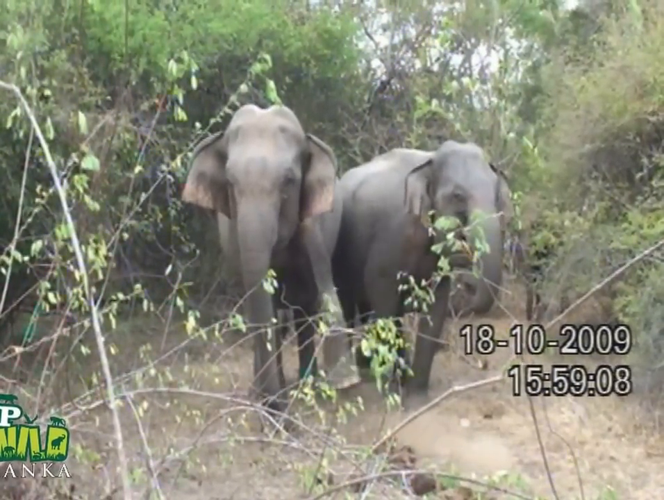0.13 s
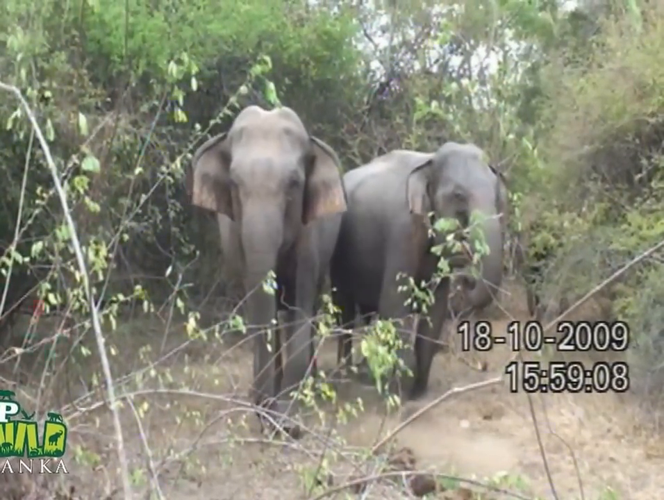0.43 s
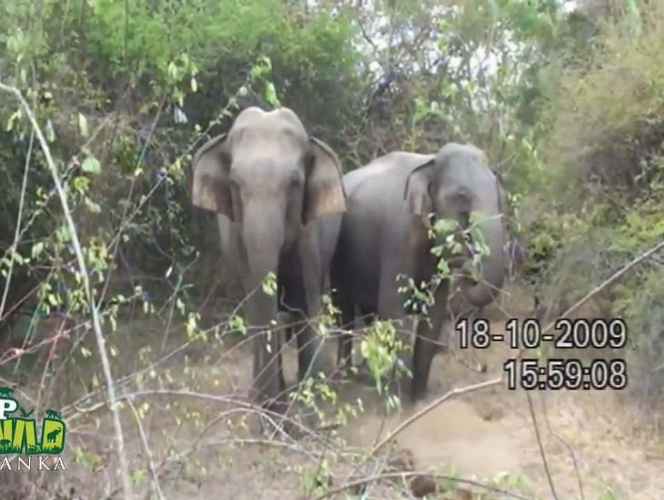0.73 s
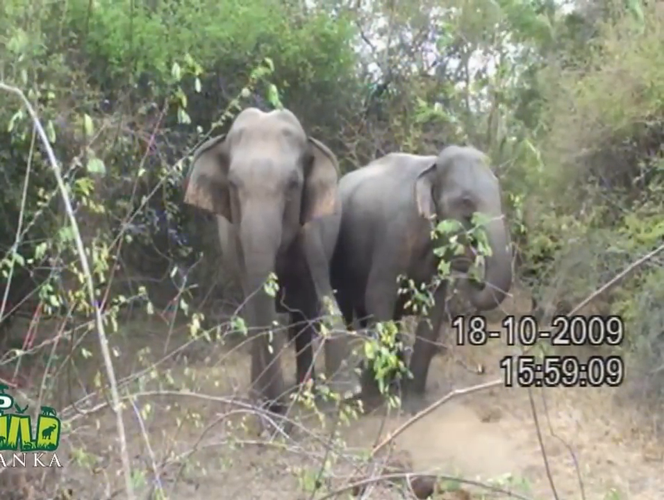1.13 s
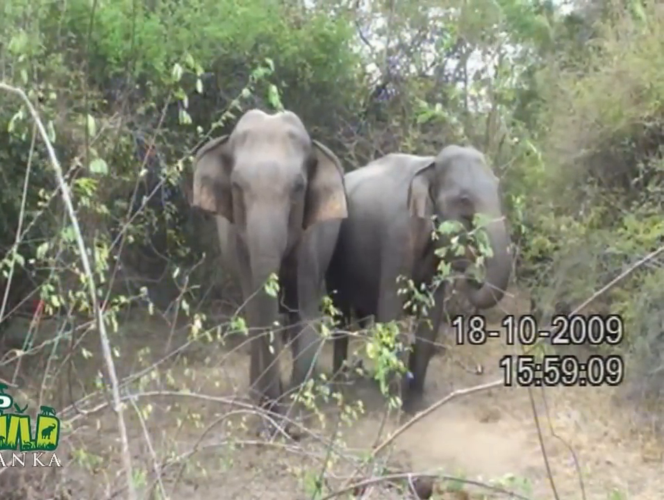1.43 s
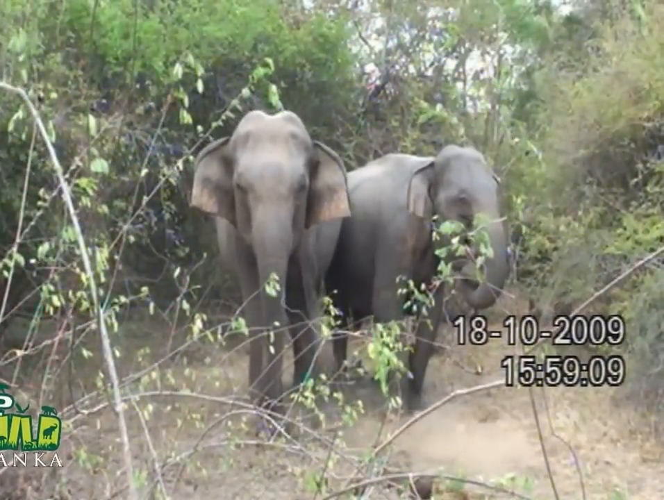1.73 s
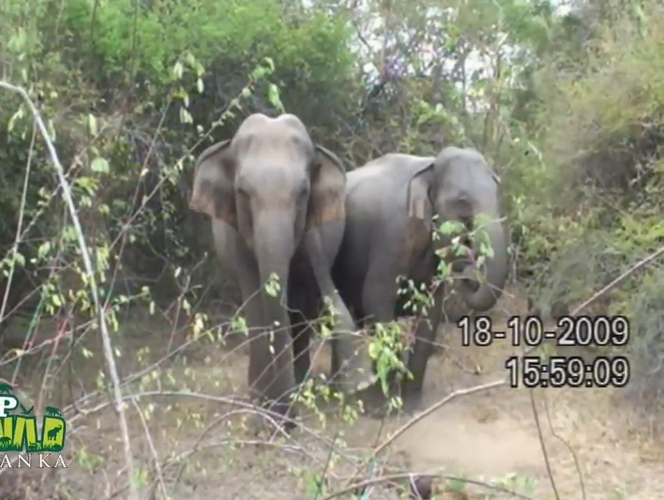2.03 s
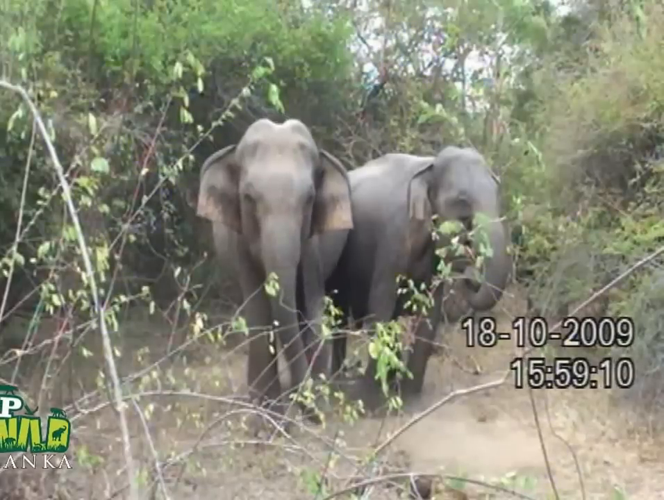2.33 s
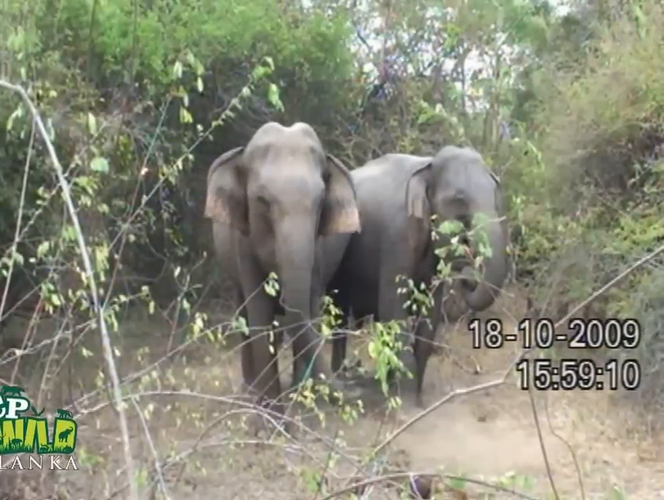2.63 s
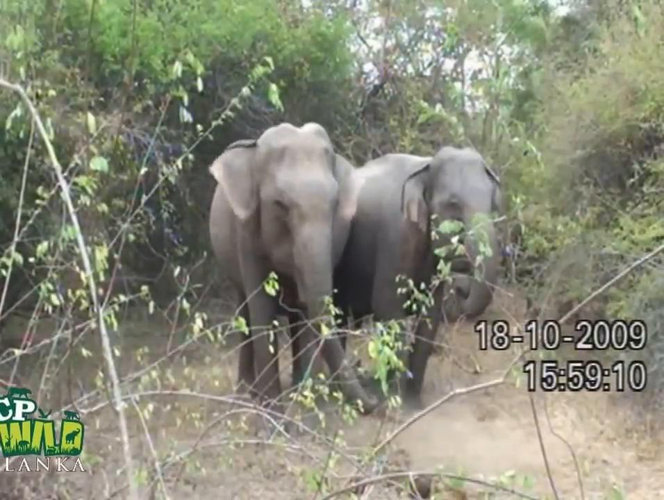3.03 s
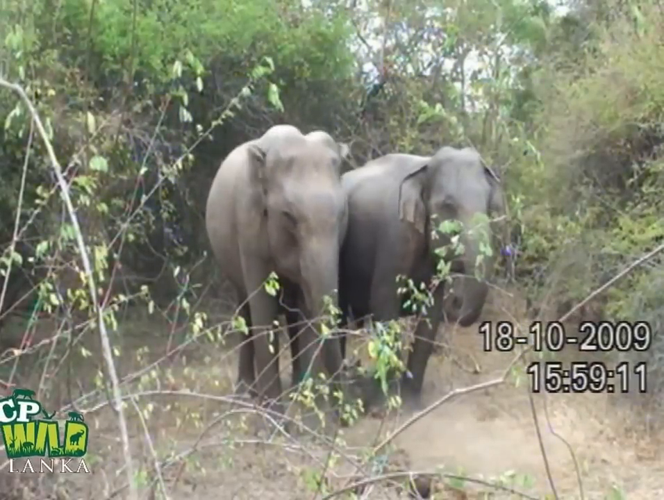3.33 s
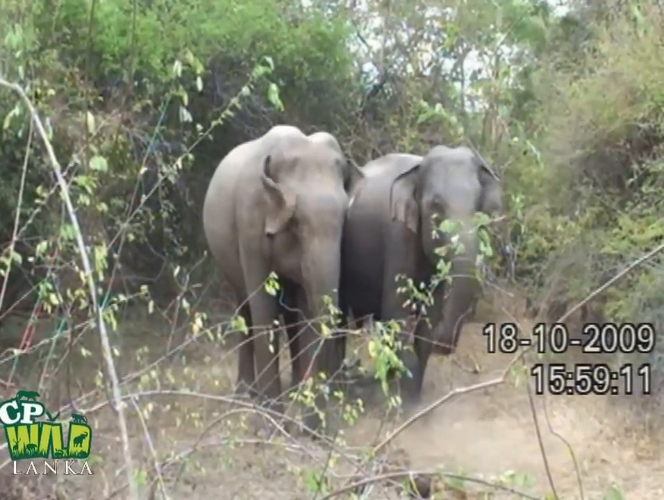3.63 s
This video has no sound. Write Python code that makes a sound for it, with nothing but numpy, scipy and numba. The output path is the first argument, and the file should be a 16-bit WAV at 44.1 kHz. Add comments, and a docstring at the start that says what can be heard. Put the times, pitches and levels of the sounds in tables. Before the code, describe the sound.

An elephant gives a long, rough, growling roar over a low engine rumble.

```python
"""Elephant roaring in dry scrub

An elephant a few metres off, a vehicle idling nearby. A clear high note over a low throat tone breaks up
into a chaotic growl: irregular puffs of air ring the throat, mouth and trunk, whose shape changes three
times. A thin squeal comes near the end. The camcorder's two close microphones pick up short echoes from
the scrub; it clips the loudest peaks and adds hiss and a faint line whine."""
import sys
import numpy as np
from scipy import signal
from scipy.fft import rfft, irfft
from scipy.io import wavfile
from scipy.ndimage import uniform_filter1d
from numba import njit

SR = 44100
rng = np.random.default_rng(int(sys.argv[2]) if len(sys.argv) > 2 else 0)


def transcribe(signal):
    """Save signal, clipped to [-1, 1], as a 16-bit WAV file at the path in sys.argv[1]."""
    frames = np.atleast_2d(signal).T
    limited = np.clip(frames, -1, 1)
    pcm = np.round(limited * 32767).astype(np.int16)
    wavfile.write(sys.argv[1], SR, pcm)


N = 166257
TIME = np.arange(N) / SR


def undb(db):
    """Turn dB into gain."""
    return 10 ** (np.asarray(db) / 20)


def unit(x):
    """Scale to rms 1."""
    return x / np.sqrt(np.mean(x ** 2))


def curve(table, col):
    """One column of a table, interpolated along time."""
    table = np.array(table, float)
    return np.interp(TIME, table[:, 0], table[:, col])


def walk(rate_hz):
    """Random levels held 1 / rate_hz seconds and smoothed twice; rms 1."""
    hold = int(SR / rate_hz)
    steps = np.repeat(rng.standard_normal(N // 40)[:N // hold + 1], hold)
    return unit(uniform_filter1d(uniform_filter1d(steps, hold), hold)[:N])


def phase_of(hz):
    """Phase of a tone that follows hz."""
    return 2 * np.pi * np.cumsum(hz) / SR


def decay(kicks, seconds):
    """Give each kick an exponential tail with this time constant."""
    return signal.lfilter([1], [1, -np.exp(-1 / (seconds * SR))], kicks)


@njit
def bandpass(x, hz, width):
    """State-variable band-pass with a moving centre, gain 1 there."""
    y, band, low = np.empty(len(x)), 0., 0.
    for i in range(len(x)):
        g, damping = np.pi * hz[i] / SR, width / hz[i]
        g = g + g ** 3 / 3
        v = (band + g * (x[i] - low)) / (1 + g * (g + damping))
        band, low = 2 * v - band, low + 2 * g * v
        y[i] = damping * v
    return y


def ring(x, hz, width_hz):
    """A steep resonance: two wider band-passes in series."""
    hz = hz + np.zeros(N)
    return bandpass(bandpass(x, hz, 1.4 * width_hz), hz, 1.4 * width_hz)


def coloured(x, spectrum):
    """Shape x by a spectrum of (Hz, dB) points; rms 1."""
    hz = np.fft.rfftfreq(N, 1 / SR) + 1
    points_hz, points_db = np.array(spectrum).T
    gain = undb(np.interp(np.log(hz), np.log(points_hz), points_db))
    return unit(irfft(rfft(x) * gain, N))


# The nearby vehicle at the microphones. Each row: time in seconds, level in dB.
ENGINE_LEVEL = [(0.05, -47), (0.23, -44.5), (0.25, -49), (1.99, -44), (2.06, -54), (2.31, -40.5),
                (3.77, -38.5)]
# Its hum. Each row: multiple of the firing rate, relative level in dB.
ENGINE_ORDERS = [(1, -22.5), (2, -10), (3, -2.5), (4, -18.5), (5, -17)]


def engine(firing_hz=26):
    """A vehicle idling nearby: low multiples of the firing rate over a dull rumble."""
    phase = phase_of(firing_hz * (1 + .013 * walk(3)))
    beat = sum(undb(db + .55 * walk(11)) * np.sin(k * phase) for k, db in ENGINE_ORDERS)
    rumble = ring(rng.standard_normal(N), hz=110, width_hz=80)
    return unit(unit(beat) + undb(-11) * unit(rumble)) * undb(curve(ENGINE_LEVEL, 1))


def scrub_echoes(x, t60_s=.29, level_db=-8):
    """Two short, unlike tails of echoes scattered by the scrub around the animal."""
    t = np.arange(SR // 2) / SR
    tails = rng.standard_normal((2, len(t))) * undb(-60 * t / t60_s)
    tails /= np.sqrt(np.sum(tails ** 2, axis=1, keepdims=True))
    return undb(level_db) * signal.fftconvolve(x[None], tails, axes=1)[:, :N]


# The closing squeal. Each row: time in seconds, lower and upper pitch in Hz, level of each in dB.
WHISTLES = [(3.38, 2360, 2590, -60), (3.43, 2415, 2625, -32), (3.49, 2425, 2650, -41),
            (3.53, 2400, 2685, -34), (3.6, 2420, 2690, -38)]


def squeal():
    """Two thin, fluttering whistles near the end of the roar."""
    pair = np.zeros(N)
    for col in (1, 2):
        hz = curve(WHISTLES, col) * (1 + .006 * walk(60))
        pair += np.sin(phase_of(hz)) * undb(3 * walk(40))
    sounding = (TIME > WHISTLES[0][0]) & (TIME < WHISTLES[-1][0])
    return np.sqrt(2) * pair * undb(curve(WHISTLES, 3)) * sounding


# When throat, mouth and trunk take their next shape. Each entry: time in seconds.
SHAPE_CHANGES_S = [1.75, 3.33, 3.62]
# The grain of the low tone. Each entry: roughness from 0 to 1 in one of the four shapes.
THROAT_ROUGHNESS = [1, 1, .45, .8]
# The low tone under the roar. Each row: time in seconds, pitch in Hz, level in dB.
THROAT_TONE = [(0, 201.7, -22), (.2, 212, -20.5), (.32, 222.8, -28), (.37, 213.3, -15.5),
               (.46, 212.3, -24.5), (.7, 226.4, -20.5), (1.05, 232, -22), (1.1, 238.7, -18.5),
               (1.5, 236.6, -18.5), (1.89, 238.2, -15.5), (1.93, 239.5, -18.5), (2.08, 221, -15),
               (2.3, 230.2, -18), (2.42, 231.1, -13), (2.65, 230.2, -17.5), (2.75, 236.2, -11.5),
               (2.92, 214, -16), (3.29, 215, -14.5), (3.38, 206.3, -13.5), (3.6, 189.2, -12),
               (3.65, 148.4, -20.5), (3.7, 141.8, -21.5), (3.77, 172, -12.5)]


def throat(airflow):
    """A wavering hum and the airflow ringing the throat at the same pitch, over a faint lower ring."""
    hz = curve(THROAT_TONE, 1)
    roughness = np.array(THROAT_ROUGHNESS)[np.searchsorted(SHAPE_CHANGES_S, TIME)]
    hum = np.sin(phase_of(hz * (1 + roughness * .05 * walk(75))))
    hum *= undb(roughness * 3 * walk(22.01))
    breath = roughness * undb(-4) * unit(ring(airflow, hz, width_hz=60))
    body = unit(ring(unit(hum) + breath, hz, width_hz=140))
    chest = undb(-39.5) * unit(ring(airflow, hz=154.2, width_hz=24))
    return body * undb(curve(THROAT_TONE, 2)) + chest


# Hard slaps of tissue in the growl. Each row: start in seconds, strength in dB relative to the puffs.
TISSUE_SLAPS = [(1.412, 5), (1.785, 7), (1.837, 7), (1.869, 10), (2.026, 6), (2.369, 6), (2.755, 6),
                (2.837, 7), (2.936, 7), (3.262, 6)]


def slaps():
    """The envelope of the slaps: sudden swells that die away quickly."""
    kicks = np.zeros(N)
    for start, db in TISSUE_SLAPS:
        kicks[int(start * SR)] = undb(db)
    return decay(kicks, seconds=.005)


def pulse_train(gaps, rate_hz, levels_db):
    """Single-sample pulses, their gaps given in periods of rate_hz."""
    at = (np.cumsum(gaps) / rate_hz * SR).astype(int)
    pulses = np.zeros(N)
    pulses[at[at < N]] = undb(levels_db)[at < N]
    return pulses


def snaps():
    """Tissue snapping among the puffs: scattered, very short cracks of uneven strength."""
    gaps = rng.gamma(6, 1 / 6, 600)
    clicks = pulse_train(gaps, rate_hz=75, levels_db=2.5 * rng.standard_normal(600))
    return undb(-3) * unit(decay(clicks, seconds=.001) * rng.standard_normal(N))


def puffs(jitter=.45, air_share=.63, flap_hz=26):
    """Irregular pulses, each trailed by a spurt of air; two signals with like timing and unlike air."""
    gap_spread, levels_db = rng.standard_normal((3000, 2)).T
    pulses = pulse_train(np.exp(jitter * gap_spread), rate_hz=210.3, levels_db=levels_db)
    spurts = decay(pulses, seconds=.0053)
    bursts_db = 1.5 * walk(59.08)
    throb_db = .5 * np.sin(phase_of(flap_hz * (1 + .058 * walk(8.5))))  # a slow flap of tissue
    swell = undb(bursts_db + throb_db) * (1 + slaps())
    clicks = (1 - air_share) * unit(pulses - pulses.mean())
    airs = [air_share * unit(spurts * rng.standard_normal(N)) for _ in range(2)]
    return [unit(swell * (air + clicks)) for air in airs]


def tract(source, shapes, fade_s=.011):
    """The source rings the resonances of mouth and trunk, each shape crossfading into the next."""
    passed = [np.clip((TIME - change) / fade_s + .5, 0, 1) for change in SHAPE_CHANGES_S]
    shares = -np.diff([np.ones(N)] + passed + [np.zeros(N)], axis=0)
    voiced = np.zeros(N)
    for share, shape in zip(shares, shapes):
        rings = sum(undb(db) * ring(source, hz, width) for hz, width, db in shape)
        voiced += np.sqrt(share) * unit(rings)
    return voiced


# Hollows in the growl. Each row: centre in Hz in the first shape, the second, the last two, width in Hz.
BRANCH_NOTCHES = [(1400, 1560, 1400, 160), (880, 900, 890, 60), (2290, 2290, 1950, 150),
                  (2885, 2870, 2950, 100), (3720, 3690, 4400, 120), (4250, 4350, 4600, 200)]


def side_branches(x):
    """Side branches of the airway carve notches that move with its shape."""
    shape = np.searchsorted(SHAPE_CHANGES_S[:2], TIME)
    for *centres, width in BRANCH_NOTCHES:
        x = x - bandpass(x, np.array(centres, float)[shape], float(width))
    return x


# Resonances of mouth and trunk in four bands, each with one list per shape.
# Each row: centre in Hz, width in Hz, relative level in dB.
LOW_RINGS = [
    [(402.7, 54, -0.5), (465.7, 37, 4), (540.6, 68, 2.5), (596, 57, -4), (711, 82, -8)],
    [(381, 34, 1.5), (502.2, 72, 2.5), (557, 69, -5.5), (675.4, 33, -9.5)],
    [(298, 43, -15), (423, 60, 4.5), (540, 63, 4), (627, 33, -15.5), (800, 14, -15.5)],
    [(401, 71, -11), (534, 36, -8), (626, 31, -6), (742, 32, -6)],
]
MIDDLE_RINGS = [
    [(1037, 47, -3.5), (1117, 140, 0)],
    [(968, 42, -1), (1062, 64, -18), (1225.4, 45, 4.5)],
    [(980, 170, 6), (1100, 140, 2), (1310, 150, -5.5)],
    [(930, 140, -2), (1110, 52, 2)],
]
UPPER_RINGS = [
    [(1561, 40, 4), (1750, 47, -1.5), (1975, 240, -0.5)],
    [(1704, 14.3, 8), (1926, 185, 6), (1978, 79, 4)],
    [(1440, 140, -0.071), (1760, 180, 0.86), (2120, 53, -1.98)],
    [(1580, 260, -7.5), (2090, 260, -1)],
]
TREBLE_RINGS = [
    [(2620, 400, 5), (2980, 110, 2), (3400, 300, 2), (3970, 170, 6), (4500, 400, -9), (6500, 240, -12)],
    [(2640, 380, 3), (3050, 250, -3), (3420, 300, 1), (3975, 150, 7), (4700, 400, -7), (6400, 200, -9),
     (7900, 250, -12)],
    [(2420, 110, 0), (2670, 110, -1), (3100, 250, -13), (3450, 300, -14), (3900, 300, -7), (5200, 700, -14)],
    [(2280, 110, 7), (3050, 530, -4), (4700, 600, -10)],
]
# The broad rasp under the treble resonances. Each row: frequency in Hz, relative level in dB.
RASP_SPECTRUM = [(2000, -26), (3000, -6), (4500, -9.5), (5540, -11), (8000, -17), (11700, -21),
                 (13200, -27), (15000, -44)]
# The growl from a few metres. Each row: time in seconds, low, middle, upper and treble level in dB.
GROWL_LEVELS = [(0.03, -13, -26.5, -40, -34.5), (0.12, -13, -30, -33.5, -42.5),
                (0.18, -17, -41.5, -38, -43), (0.21, -16, -30, -28.5, -35.5), (0.26, -28, -48, -45.5, -51),
                (0.48, -20, -32.5, -33, -37), (0.64, -25, -38, -38, -45), (0.66, -13.5, -28.5, -33, -37.5),
                (0.73, -18.5, -30.5, -33, -36), (1.2, -12.5, -25, -29, -33.5),
                (1.41, -18, -29.5, -31.5, -34), (1.67, -14, -27, -29, -32.5),
                (1.75, -19.5, -31, -30.5, -35), (2.74, -16, -29, -31, -37),
                (2.86, -15.5, -28, -28.5, -32.5), (2.97, -18, -20.5, -24.5, -35),
                (3.0, -18.5, -39.5, -32, -38), (3.04, -13.5, -20.5, -29.5, -35),
                (3.08, -14, -31.5, -32.5, -42), (3.23, -13, -26.5, -34, -36.5),
                (3.57, -15.5, -27, -32.5, -31.5), (3.66, -19, -29.5, -43, -47), (3.73, -16, -31, -37, -45),
                (3.75, -20.5, -26, -33, -34)]


def growl(airflow, puffing, rasp_puffs, steady_share=.13, muffled_s=1.1):
    """Air through mouth and trunk: mostly even flow in the low band, puffs and cracks higher up."""
    cracks = snaps() + slaps() * rng.standard_normal(N)
    rasp = np.sqrt(1 - steady_share) * rasp_puffs + np.sqrt(steady_share) * rng.standard_normal(N)
    rasp = undb(-6.5) * coloured(rasp + cracks, RASP_SPECTRUM)
    low = tract(airflow, LOW_RINGS)
    middle = tract(np.sqrt(.5) * (puffing + airflow), MIDDLE_RINGS)
    upper = tract(puffing + cracks, UPPER_RINGS)
    treble = unit(tract(puffing + cracks, TREBLE_RINGS) + rasp)
    bands = (low, middle, upper, treble)
    voice = sum(band * undb(curve(GROWL_LEVELS, col)) for col, band in enumerate(bands, 1))
    # One treble ring starts muffled and opens up.
    muffling = np.sqrt(np.clip(1 - TIME / muffled_s, 0, 1))
    voice -= muffling * bandpass(voice, hz=np.full(N, 3950.), width=700.)
    return side_branches(voice)


# The high note from a few metres. Each row: time in seconds, pitch in Hz, level in dB,
# roughness from 0 (clear) to about 1, gain of the overtones in dB.
HIGH_NOTE = [(0, 410, -10, 0.8, -1), (.17, 409.5, -12.5, 0.24, -18.5), (.21, 422, -5, 0.09, -12),
             (.4, 425.4, -6, 0.15, -6), (.53, 426.6, -5.5, 0.1, -4), (.6, 425.4, -7.5, 0.08, -24),
             (.68, 418, -9, 0.31, -7), (.9, 414, -12.5, 0.35, -13), (1.0, 402.7, -17.5, 0.48, -20),
             (1.3, 405, -15.5, 0.49, -15), (1.45, 406.6, -9.5, 0.26, -8), (1.55, 408.2, -16, 0.46, -8),
             (1.67, 401.4, -11, 0.39, -19), (1.78, 397.8, -19, 0.8, -20), (3.0, 409, -31.5, 1.01, -10),
             (3.33, 423.2, -19, 0.49, -26), (3.36, 421, -10.5, 0.16, -26), (3.42, 412.6, -31, 0.19, -25),
             (3.48, 407, -18, 0.42, -17), (3.77, 417, -27, 1, -15)]
# Its overtones. Each row: multiple of the pitch, level in dB relative to the note before that gain.
OVERTONES = [(2, -34), (3, -21), (4, -23), (5, -42), (7, -38)]


def high_note(wobble=.045, flutter_db=5.5):
    """The elephant's high note: near a sine when clear, wavering in pitch and level when rough."""
    roughness = np.clip(curve(HIGH_NOTE, 3), 0, 1)
    phase = phase_of(curve(HIGH_NOTE, 1) * (1 + wobble * roughness * walk(70)))
    overtones = sum(undb(db) * np.sin(k * phase) for k, db in OVERTONES)
    wave = np.sin(phase) + undb(curve(HIGH_NOTE, 4)) * overtones
    return np.sqrt(2) * wave * undb(curve(HIGH_NOTE, 2) + flutter_db * roughness * walk(45))


# Balance between the two microphones. Each row: frequency in Hz, left over right in dB.
MIC_BALANCE = [(60, -1.0), (120, -1.5), (200, -3.0), (380, -2.5), (700, -1.0), (1290, 0.0), (2380, -4.5),
               (4400, -2.0), (8120, -0.5), (15000, 0.0)]
# Phase between them. Each row: frequency in Hz, lead of the left in radians.
MIC_PHASE = [(0, 0), (600, 0.6), (950, 0.3), (1290, -0.9), (1550, 0.2), (2500, 0.3), (2930, 0.1),
             (5680, 0.15), (6800, 0.0)]


def microphone_pair(x):
    """Sound reaches two closely spaced microphones, each with its own colour and phase."""
    padded = np.pad(x, SR, "reflect")
    hz = np.fft.rfftfreq(len(padded), 1 / SR)
    balance_db = np.interp(hz, *np.array(MIC_BALANCE).T)
    lead = np.interp(hz, *np.array(MIC_PHASE).T)
    left = undb(balance_db / 2) * np.exp(.5j * lead)
    return irfft(rfft(padded) * np.array([left, 1 / left]), len(padded))[:, SR:-SR]


def scene(steady_share=.93):
    """The roar, its echoes from the scrub and the idling engine, as they reach the microphones."""
    puffing, rasp_puffs = puffs()
    airflow = np.sqrt(1 - steady_share) * puffing + np.sqrt(steady_share) * rng.standard_normal(N)
    tones = high_note() + throat(airflow) + squeal()
    growling = growl(airflow, puffing, rasp_puffs)
    # The tones get only a faint echo, so they stay clear and steady.
    echo, side_echo = scrub_echoes(growling + undb(-8) * tones)
    # The second tail, dulled and opposite in the two channels, gives the scrub its width.
    side = undb(-3) * signal.lfilter([.3], [1, -.7], side_echo) * np.array([[1], [-1]])
    return microphone_pair(tones + growling + echo + engine()) + side


# Hiss of the microphones. Each row: frequency in Hz, relative level in dB.
MIC_HISS = [(1760, -35), (3000, -8), (4900, -19), (10600, -32), (13100, -24.5), (14700, -59)]


def record(dry, whine_hz=15625, top_hz=15900, headroom=1.58):
    """The camcorder rounds the peaks, adds line whine and hiss, cuts the top and clips at full scale."""
    whine = undb(-72) * np.sin(phase_of(np.full(N, whine_hz)))
    hiss = undb(-47) * coloured(rng.standard_normal(N), MIC_HISS)
    rounded = headroom * np.tanh(dry / headroom)
    lowpass = signal.ellip(8, .2, 70, top_hz, fs=SR, output="sos")
    return np.clip(signal.sosfilt(lowpass, rounded + whine + hiss), -1, 1)


dry = scene()
out = record(dry)
transcribe(out)
```